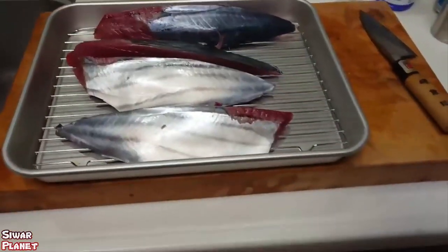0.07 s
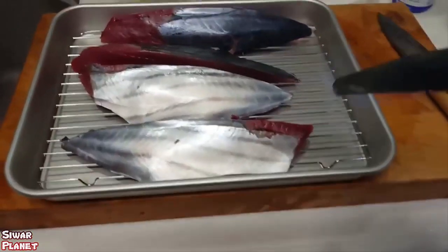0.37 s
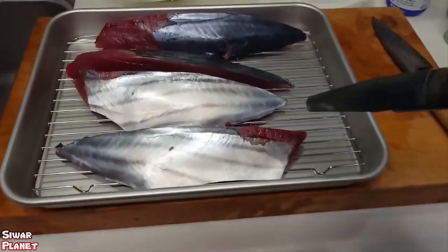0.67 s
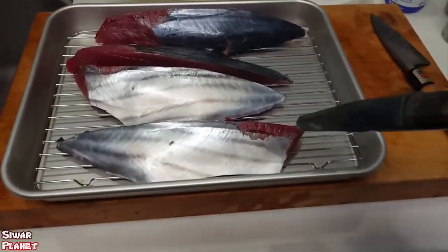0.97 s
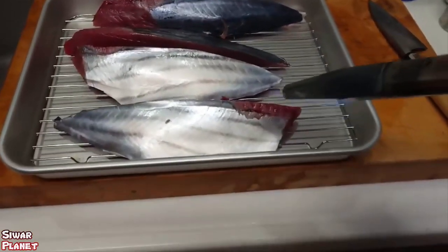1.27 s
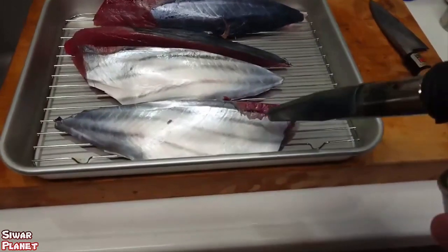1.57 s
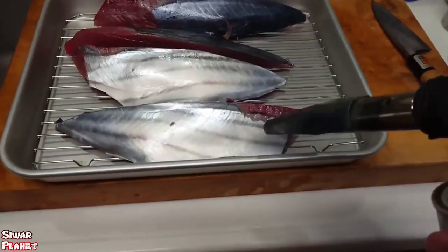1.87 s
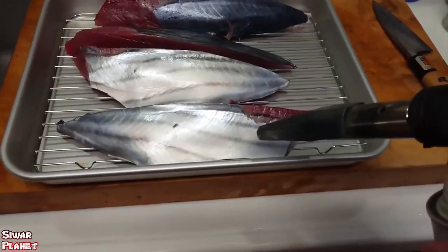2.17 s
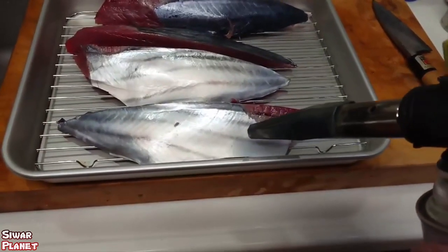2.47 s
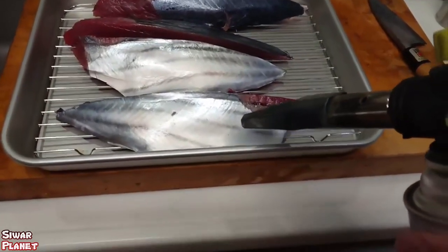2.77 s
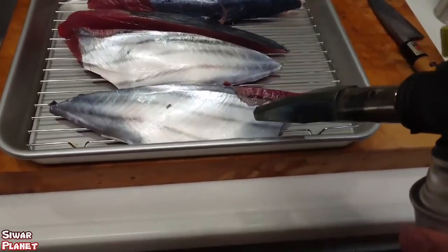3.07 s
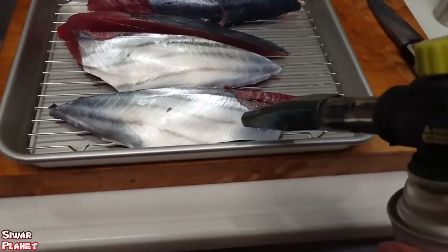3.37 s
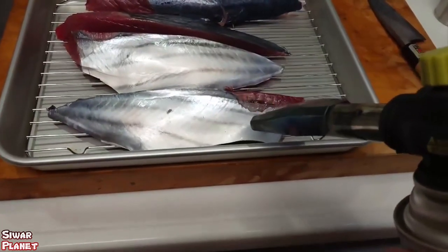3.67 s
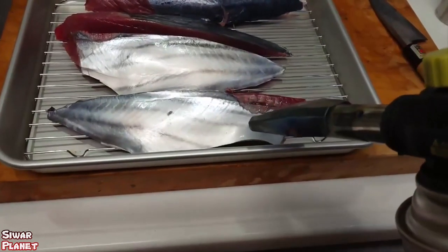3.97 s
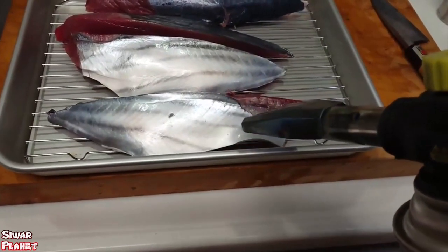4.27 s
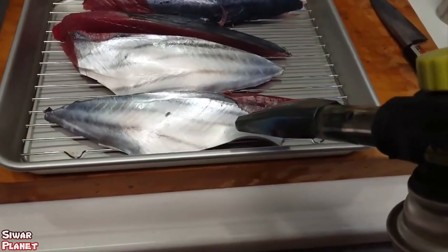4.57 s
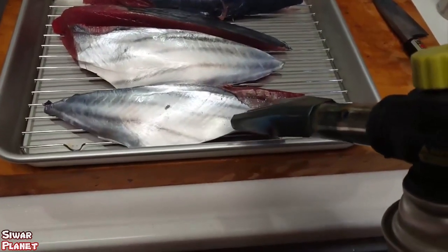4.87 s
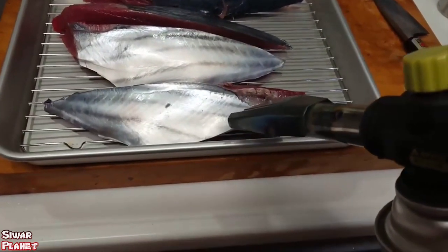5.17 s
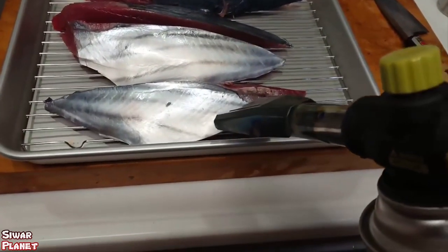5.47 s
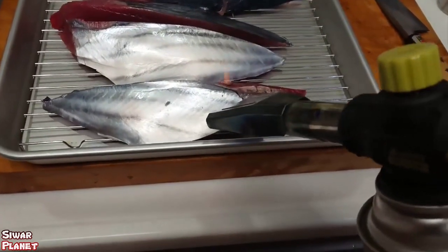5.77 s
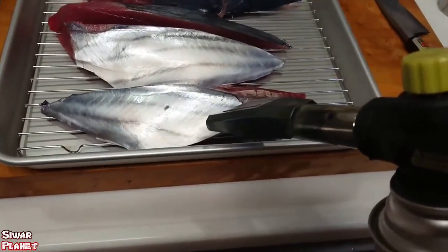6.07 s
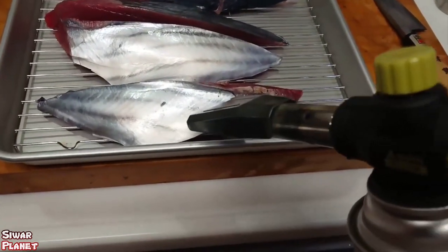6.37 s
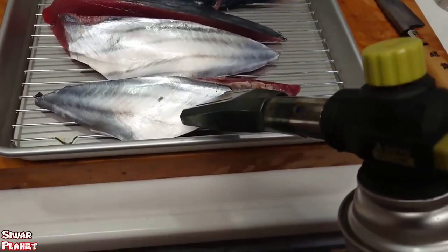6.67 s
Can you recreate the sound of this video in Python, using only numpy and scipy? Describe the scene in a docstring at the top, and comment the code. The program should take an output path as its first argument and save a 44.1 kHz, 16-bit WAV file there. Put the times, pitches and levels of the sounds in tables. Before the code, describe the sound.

After a moment of silence, a handheld gas torch opens abruptly at about 0.4 seconds, close to the microphone in a kitchen. It burns steadily to the end: a low, turbulent roar with gas rushing through the burner tube and a thinner hiss above. At first the tube rings slightly hollow; over the next two seconds the tone shifts as the nozzle comes down toward fish fillets on a steel tray, and the roar grows a little. Small irregular puffs break through, strongest around 4 and 5.2 seconds. A faint, high sizzle builds on the skin, with brief spits of steam from about 2.5 seconds, more frequent after 3.8. Two tiny, sharp snaps come near 5.5 seconds, then one light, dull knock at 5.7. The torch continues, its rush slightly stronger, until about 6.7 seconds.

```python
"""Searing fish with a gas torch

A handheld torch opens abruptly, close by in a kitchen, and sears fish fillets on a steel tray.
The turbulent flame roars and puffs, the gas jet hisses in the burner tube, and interference with
the tray's reflection colours both as the nozzle comes down. Moisture boils off the skin in a
sizzle with occasional spits, and something knocks once."""
import sys
import numpy as np
from scipy import signal
from scipy.fft import rfft, irfft, next_fast_len
from scipy.io import wavfile
from scipy.ndimage import map_coordinates

SR = 44100
rng = np.random.default_rng(int(sys.argv[2]) if len(sys.argv) > 2 else 0)


def persist_wave(psi):
    """Save psi, clipped to +-1, as 16-bit WAV."""
    counts = np.round(np.clip(psi, -1, 1) * 32767).astype(np.int16)
    wavfile.write(sys.argv[1], SR, np.atleast_2d(counts).T)


N = 296352
TIME_S = np.arange(N) / SR
GAS_ON_S, APPROACH_S = 0.4313, 1.3


def amp(db):
    """Amplitude ratio of a level in decibels."""
    return 10 ** (np.asarray(db) / 20)


def along(points, hz):
    """Interpolation of (hz, value) points on a logarithmic frequency axis."""
    knots_hz, values = np.transpose(points)
    return np.interp(np.log(hz + 1), np.log(knots_hz + 1), values)


def curves(rows):
    """Linear interpolation in time: one value per sample for each column after the first."""
    times_s, *columns = np.transpose(rows)
    return [np.interp(TIME_S, times_s, column) for column in columns]


def since(start_s):
    """Elapsed seconds, zero before the start."""
    return np.maximum(TIME_S - start_s, 0)


def wobble(rate_hz):
    """Smooth random modulation: a spline through rate_hz Gaussian values a second."""
    return map_coordinates(rng.standard_normal(int(N * rate_hz / SR) + 4), [TIME_S * rate_hz])


def filtered(x, response):
    """Linear filtering: the spectrum is multiplied by a frequency response."""
    size = next_fast_len(N + 8192)
    return irfft(rfft(x, size) * response(np.fft.rfftfreq(size, 1 / SR)), size)[..., :N]


def bumps(table, hz):
    """Lorentzian peaks and notches, summed in decibels."""
    return sum(db / (1 + (2 * (hz - centre) / width) ** 2) for centre, width, db in table)


def recoloured(x, table, share):
    """Crossfade by a share (0-1) towards the table's peaks and notches."""
    return x + share * (filtered(x, lambda hz: amp(bumps(table, hz))) - x)


def noise_band(centre_hz, half_width_hz):
    """Quadrature modulation: slow noise shifted to a fixed or moving centre, at rms 1."""
    slow = filtered(rng.standard_normal((2, 2, N)), lambda hz: 1 / (1 + (hz / half_width_hz) ** 2))
    phase = 2 * np.pi * np.cumsum(np.full(N, centre_hz)) / SR
    band = slow[0] * np.cos(phase) + slow[1] * np.sin(phase)
    return band / np.sqrt(np.mean(band ** 2))


# Stereo width of the sound field: frequency_hz, side_minus_mid_db
STEREO_WIDTH = [(60, -18), (92, -24), (140, -20), (210, -26), (330, -26.5), (500, -9.5), (770, -6),
                (1100, -4.5), (1350, -8.5), (1790, -4.5), (2350, -4.5), (2740, 0), (4190, 0), (6410, -1),
                (7600, 1), (8500, -5.5), (9700, -1.5), (10600, -1.5), (15000, -0.5)]

def spread(pair, colour_db):
    """Partial coherence: two independent noises become left and right, alike only in the bass."""
    mid, side = filtered(pair, lambda hz: amp([colour_db(hz), colour_db(hz) + along(STEREO_WIDTH, hz)]))
    return np.array([mid + side, mid - side]) / np.std(mid)


def distance():
    """Nozzle distance from the fish: 1 when the gas comes on, 0 once the hand has settled."""
    return np.exp(-(since(GAS_ON_S) / APPROACH_S) ** 2)


# Resonances and antiresonances of tray, counter and burner: centre_hz, width_hz, gain_db
RESONANCES = [(232, 25, 2.5), (305, 40, 1.5), (370, 50, 1.5), (425, 25, -4), (455, 30, 2), (613, 35, 4),
              (672, 40, 2.5), (760, 60, -4), (861, 50, 5), (935, 45, 4), (1035, 70, -4.5), (1130, 60, -4),
              (1265, 90, 4), (1406, 45, 3.5), (1450, 30, -4), (1652, 65, 4), (1735, 40, -2),
              (1810, 40, 2.5), (2107, 35, 5), (2240, 50, 4), (2380, 90, -3), (2646, 40, 2), (2825, 35, 2),
              (2940, 55, 4.5), (3430, 90, -3.5), (4060, 140, -4.5)]

def turbulence(spectrum, eddy_hz, eddy_db):
    """Turbulent noise: eddies of uneven strength excite the resonances around the flame."""
    eddies = rng.standard_normal((2, N)) * amp(eddy_db * wobble(eddy_hz))
    return spread(eddies, lambda hz: along(spectrum, hz) + bumps(RESONANCES, hz))


# Spectrum of the flame: frequency_hz, density_db
FLAME_SPECTRUM = [(18, -41), (32, -38), (48, -9), (78, -3.5), (140, 2), (205, -1.5), (350, -2.5),
                  (440, -7.5), (620, -15), (780, -25), (1500, -26.5), (4000, -75)]
# Slow swell of the roar: time_s, gain_db
FLAME_SWELL = [(.45, 0.5), (1.1, 0.5), (1.55, 0.5), (2.35, 0.2), (2.55, 0.5), (3.3, 0.5), (3.8, -0.3),
               (4.3, 0.7), (4.9, 0), (5.2, 0), (5.7, -0.5), (6.3, 1.1), (6.7, 0)]

def flame_roar(surge_db, flutter):
    """Combustion noise: turbulent burning gives a low roar, louder near the fish."""
    swell_db, = curves(FLAME_SWELL)
    level_db = -22 - 3 * distance() + swell_db + surge_db + 0.37 * flutter
    return amp(level_db) * turbulence(FLAME_SPECTRUM, eddy_hz=160, eddy_db=1.5)


# Bearing of the burner: time_s, left_lag_ms
BURNER_BEARING = [(.45, 0.16), (1.3, 0.11), (2.3, 0.053), (4.7, 0.01), (5.5, 0.034)]

def from_the_right(x):
    """Path difference: the burner's sound reaches the left microphone port after the right."""
    lag_ms, = curves(BURNER_BEARING)
    half_lag = lag_ms * SR / 2000
    n = np.arange(N)
    return np.array([map_coordinates(x[0], [n - half_lag]), map_coordinates(x[1], [n + half_lag])])


# Spectrum of the flow in the burner tube: frequency_hz, density_db
TUBE_SPECTRUM = [(300, -14.5), (700, 4), (900, -0.5), (1090, 2), (1350, -2.5), (1800, -1), (2150, -3),
                 (2420, -1), (2950, -5), (3300, -9), (3900, -18.5), (6000, -29), (12000, -60)]

def tube_rush(swing_db):
    """Duct flow noise: gas rushes through the burner tube."""
    level_db = -34 - distance() + swing_db
    return from_the_right(amp(level_db) * turbulence(TUBE_SPECTRUM, eddy_hz=330, eddy_db=0.4))


# Modes of the burner tube in free air: centre_hz, half_width_hz, level_db
PIPE_MODES = [(872, 120, -38.5), (1220, 140, -39.5)]

def open_tube():
    """Pipe resonance: the burner's air column rings, fading as its mouth nears the fish."""
    ring = sum(amp(db) * noise_band(hz, half_width) for hz, half_width, db in PIPE_MODES)
    narrowed = (ring.mean(axis=0) + ring) / 2
    return (TIME_S > GAS_ON_S) * distance() * from_the_right(narrowed)


# Spectrum of the gas jet: frequency_hz, density_db
NOZZLE_SPECTRUM = [(1500, -41), (3500, 3.5), (4700, 1), (5700, -2), (6900, 0), (9000, -4.5), (10500, -9.5),
                   (12000, -9), (14500, -11), (16000, -9)]

def nozzle_hiss(swing_db):
    """Jet noise: fine eddies at the nozzle radiate a high hiss."""
    level_db = -44.5 - 0.8 * distance() + swing_db
    return amp(level_db) * turbulence(NOZZLE_SPECTRUM, eddy_hz=240, eddy_db=0.5)


# Hollow note of the flame between nozzle and fish: time_s, level_db
HOLLOW_NOTE = [(.45, -46), (.8, -48), (1.15, -43.5), (1.6, -47), (2.5, -48), (3.3, -42.5), (4.2, -43),
               (4.7, -58), (6.7, -55)]
SCORCH_S, SCORCH_DB_PER_S = 5.5, 23

def flame_contact():
    """Jet impingement: a hollow note, and a central hiss that grows until the skin is scorched."""
    hollow_db, = curves(HOLLOW_NOTE)
    hollow = noise_band(centre_hz=2835 + 60.14 * distance(), half_width_hz=260)
    impact_db = -50 - SCORCH_DB_PER_S * np.maximum(SCORCH_S - TIME_S, 0)
    impact = noise_band(centre_hz=4620, half_width_hz=380)[0]
    return amp(hollow_db) * hollow + amp(impact_db) * impact


# Reflection off the tray: time_s, delay_ms, strength_ratio
TRAY_ECHO = [(.45, .88, .3), (.9, .72, .22), (1.15, .6, .42), (1.4, .595, .42), (1.9, .59, .15)]

def tray_bounce(x):
    """Comb filtering: sound interferes with its reflection; the comb rises as the nozzle descends."""
    delay_ms, strength = curves(TRAY_ECHO)
    n = np.arange(N)
    delayed = n - delay_ms * SR / 1000
    # The bass diffracts past the tray and the fillets scatter the treble.
    reflected = filtered(x, lambda hz: hz ** 2 / (hz ** 2 + 1200 ** 2) / (1 + (hz / 4500) ** 4))
    return x + strength * np.array([np.interp(delayed, n, channel) for channel in reflected])


# Scattered reflections: frequency_hz, scattered_to_direct_ratio
SCATTERING = [(300, .02), (900, .25), (2000, .65), (3500, .9), (6500, .75), (9000, .4)]

def hand_drift(x, patch_hz=50, patch_s=0.26):
    """Multipath fading: as the hand moves, reflections add and cancel in narrow, shifting patches."""
    mid_side = np.array([x[0] + x[1], x[0] - x[1]]) / 2
    hz, t, spectra = signal.stft(mid_side, SR, nperseg=2048)
    grid = np.meshgrid(hz / patch_hz, t / patch_s, indexing="ij")
    fields = [map_coordinates(rng.standard_normal((512, 40)), grid, mode="nearest") for _ in range(4)]
    diffuse = (np.array(fields[:2]) + 1j * np.array(fields[2:])) / np.sqrt(2)
    scatter = along(SCATTERING, hz)[:, None]
    gain = np.abs(1 + scatter * diffuse) / np.sqrt(1 + scatter ** 2)
    mid, side = signal.istft(spectra * gain, SR, nperseg=2048)[1][..., :N]
    return np.array([mid + side, mid - side])


# Colour of the jet with the nozzle held away: centre_hz, width_hz, gain_db
DISTANT_COLOUR = [(695, 230, -2.5), (1650, 500, -2.5), (3160, 250, 0.5), (3620, 300, -1.5),
                  (9500, 2600, -1.5)]
# Colour of the jet once tipped towards the microphone: centre_hz, width_hz, gain_db
TIPPED_COLOUR = [(4030, 200, -5), (5250, 250, -3), (6800, 400, 2)]
TIP_S, VALVE_RISE_S = 5.6, 0.0019

def torch():
    """Common modulation: one unsteady gas flow, opened by the valve, drives roar, rush and hiss."""
    unrest = 1 - distance() / 2  # the jet is steadier in free air
    flutter = unrest * wobble(45)
    surge_db = flame_surge()
    sway_db = -0.74 * wobble(8.4)  # the unsteady hand
    tipped = (1 + np.tanh((TIME_S - TIP_S) / 0.17)) / 2
    tube_db = 1.6 * tipped + sway_db + 0.12 * surge_db + 0.76 * flutter + 0.87 * unrest * wobble(12)
    hiss_db = sway_db + 0.5 * flutter + 0.94 * unrest * wobble(18)
    jet = flame_roar(surge_db, flutter) + tube_rush(tube_db) + nozzle_hiss(hiss_db)
    jet = tray_bounce(jet) + amp(1.2 * flutter) * flame_contact()
    jet = recoloured(jet, DISTANT_COLOUR, distance())
    jet = recoloured(jet, TIPPED_COLOUR, tipped)
    valve = 1 - np.exp(-since(GAS_ON_S) / VALVE_RISE_S)
    return valve * hand_drift(jet)


# Reflection off the wall at the left: frequency_hz, gain_db
WALL_ECHO = [(200, -42), (450, -27), (650, -19), (1100, -17), (2200, -18), (3000, -25), (4500, -27),
             (12000, -32)]

def wall_reflection(x, delay_s=0.00147):
    """Lateral reflection: a late copy from the side reaches the two ports out of phase."""
    response = lambda hz: 1j * amp(along(WALL_ECHO, hz)) * np.exp(-2j * np.pi * hz * delay_s)
    echo = filtered(x.mean(axis=0), response)
    return x + np.array([echo, -echo])


def crackle(rate_hz):
    """Shot noise: tiny bubbles burst as random impulses of uneven size."""
    return (rng.random((2, N)) < rate_hz / SR) * rng.standard_normal((2, N))


# Spectrum of the sizzling skin: frequency_hz, density_db
SIZZLE_SPECTRUM = [(2500, -37), (6000, 1), (8500, 3.5), (10500, 4), (12500, -1.5), (16000, -16)]

def sizzle():
    """Boiling: moisture leaves the skin in a sputtering fizz that grows as the flame nears."""
    fizz = spread(crackle(rate_hz=5000), lambda hz: along(SIZZLE_SPECTRUM, hz))
    level_db = -53 - 10 * distance() + 1.4 * wobble(24)
    return (TIME_S > GAS_ON_S) * amp(level_db) * fizz


# Pockets of gas that flare at once: start_s, pulse_db, roar_lift_db
FLARES = [(.537, -21, 3), (.698, -23, 3.5), (1.647, -19, 2.5), (1.979, -23, 3), (2.35, -17, 1.5),
          (2.617, -14, 3.5), (2.994, -16, 3), (3.965, -10, 3.5), (4.217, -15, 2.5), (4.643, -16, 3),
          (5.066, -12, 2.5), (5.175, -10, 4), (6.26, -20, 2.5)]

def flame_surge(catch_s=0.063, flare_s=0.02):
    """Unsteady combustion, in dB: the roar builds as it catches, wavers and swells with each flare."""
    catch_db = -6 * np.exp(-since(GAS_ON_S) / catch_s)
    flares_db = sum(lift_db * np.exp(-((TIME_S - start_s - flare_s / 2) / flare_s) ** 2)
                    for start_s, _, lift_db in FLARES)
    return catch_db + 0.3 * wobble(22) + flares_db


def puffs(swell_s=0.0013):
    """Monopole radiation: each flaring pocket expands, giving one push and one pull of pressure."""
    out = np.zeros(N)
    for start_s, pulse_db, _ in FLARES:
        age = (TIME_S - start_s - 0.004) / swell_s
        out -= amp(pulse_db) * age * np.exp(-age ** 2 / 2)
    return out


def antiphase(x, peak_s=1.3, half_length_s=0.3, centre_hz=2520, half_width_hz=150):
    """Phase opposition: as the torch descends, one narrow band briefly inverts at the right port."""
    band = filtered(x.mean(axis=0), lambda hz: np.exp(-((hz - centre_hz) / half_width_hz) ** 2))
    passing = np.exp(-((TIME_S - peak_s) / half_length_s) ** 2)
    return np.array([x[0], x[1] - 1.7 * passing * band])


# Bursts of steam from the skin: start_s, level_db, length_s, centre_hz
STEAM_SPITS = [(2.477, -48, .046, 12000), (3.853, -48, .02, 12500), (3.872, -44, .027, 10000),
               (4.08, -43.5, .035, 10000), (4.285, -43.5, .1, 9400), (4.72, -48, .08, 12000),
               (5.108, -47, .025, 12500), (5.452, -45, .014, 11000), (5.523, -43, .018, 9000),
               (5.532, -45.5, .07, 8700), (5.572, -45.5, .045, 12000)]

def spits():
    """Venting: a breaking blister lets out steam in a short burst of dense crackle."""
    out = np.zeros((2, N))
    for start_s, level_db, length_s, centre_hz in STEAM_SPITS:
        age = since(start_s) / length_s
        steam = spread(crackle(rate_hz=7300), lambda hz: -36 * np.log2((hz + 1) / centre_hz) ** 2)
        out += amp(level_db) * (1 - np.exp(-age / 0.16)) * np.exp(-age ** 2) * steam
    return out


# Blisters that burst sharply: start_s, level_db
BLISTER_SNAPS = [(5.452, -34), (5.5235, -31)]

def snaps(decay_s=0.0055, centre_hz=7500):
    """Sudden pressure release: a blister ruptures with a bright, broadband crack."""
    out = np.zeros((2, N))
    for start_s, level_db in BLISTER_SNAPS:
        age = since(start_s) / decay_s
        crack = spread(rng.standard_normal((2, N)), lambda hz: -7 * np.log2((hz + 1) / centre_hz) ** 2)
        out += amp(level_db) * (1 - np.exp(-10 * age)) * np.exp(-age) * crack
    return out


# A light knock and its rebounds: start_s, level_db, pitch_ratio
IMPACTS = [(5.6975, -11.5, 1), (5.7095, -17.5, 1.1), (5.7195, -17, .7)]
# Modes of the struck object: pitch_hz, gain_db, t60_s
IMPACT_MODES = [(1080, -4, .016), (1240, 0, .025), (1390, -8, .04), (2060, -11, .02)]

def knock(attack_s=0.001):
    """Damped modal vibration: each impact excites a few modes that die fast in a dull knock."""
    out = np.zeros((2, N))
    for start_s, level_db, pitch_ratio in IMPACTS:
        t = since(start_s)
        attack = 1 - np.exp(-t / attack_s)
        for pitch_hz, gain_db, t60_s in IMPACT_MODES:
            phase = 0.5 * rng.standard_normal((2, 1))  # each port hears the mode in its own phase
            envelope = attack * amp(level_db + gain_db - 60 * t / t60_s)
            out += envelope * np.sin(2 * np.pi * pitch_ratio * pitch_hz * t + phase)
    return out


def scene():
    """Superposition: torch and fish with their wall reflection, the knock and the ringing tube."""
    searing = torch() + sizzle() + puffs() + spits() + snaps()
    return antiphase(wall_reflection(searing)) + knock() + open_tube()


# Notches of the microphone ports: centre_hz, width_hz, gain_db
PORT_NOTCHES = [(7640, 600, -14), (11400, 1000, -6.5), (15200, 470, -16)]
# Imbalance between the ports: frequency_hz, left_minus_right_db
PORT_BALANCE = [(60, -1), (350, -1), (1500, 0.5), (2740, -0.5), (3500, -0.7), (6400, -0.5), (9500, 1),
                (11000, 0), (14000, -5), (15500, -2)]
BAND_LIMIT_HZ = 15750

def record(dry):
    """Frequency response: the two ports colour the sound and a steep low-pass limits its band."""
    sides = np.array([[0.5], [-0.5]])
    ports = lambda hz: amp(bumps(PORT_NOTCHES, hz) + sides * along(PORT_BALANCE, hz))
    low_pass = lambda hz: 1 / (1 + (hz / BAND_LIMIT_HZ) ** 600)
    return filtered(dry, lambda hz: ports(hz) * low_pass(hz))


dry = scene()
out = record(dry)
persist_wave(out)
```